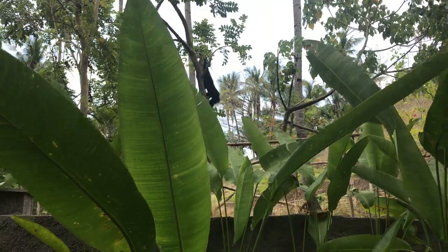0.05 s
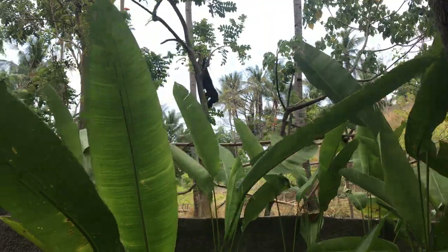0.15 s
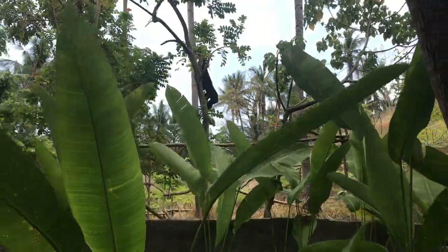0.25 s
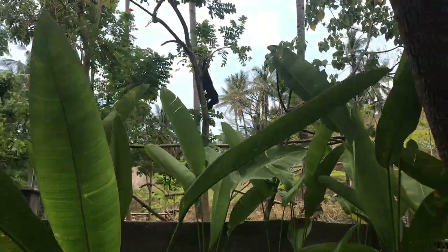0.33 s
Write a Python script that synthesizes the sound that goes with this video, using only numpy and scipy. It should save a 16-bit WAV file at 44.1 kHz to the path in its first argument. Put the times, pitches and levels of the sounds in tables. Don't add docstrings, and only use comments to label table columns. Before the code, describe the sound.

Loud gibbon calling in a leafy garden: a wavering sustained tone overlapped by a brief upward hoot, then a dozen quick downward whoops with dense short echo, faint air and soft wind bumps on a phone microphone.

```python
import sys
import numpy as np
from scipy import signal
from scipy.fft import rfft, irfft
from scipy.io import wavfile
from scipy.ndimage import uniform_filter1d

SR = 44100
rng = np.random.default_rng(int(sys.argv[2]) if len(sys.argv) > 2 else 0)


def store_wav(level_fs):
    pcm = np.round(np.clip(np.atleast_2d(level_fs), -1, 1) * 32767)
    wavfile.write(sys.argv[1], SR, pcm.T.astype(np.int16))


def makeup_ratio(level_db):
    decades = np.asarray(level_db, float) / 20
    return 10 ** decades


N = 132300

LEAD_S = 0.4
M = N + int(LEAD_S * SR)
T = np.arange(M) / SR - LEAD_S


def level(x, db):
    return x * makeup_ratio(db) / np.sqrt(np.mean(x ** 2))


def noise():
    return rng.standard_normal(M)


def band(x, low_hz, high_hz, order=2):
    return signal.sosfilt(signal.butter(order, [low_hz, high_hz], "band", fs=SR, output="sos"), x)


def lowpass(x, top_hz, order):
    return signal.sosfilt(signal.butter(order, top_hz, fs=SR, output="sos"), x)


def walk(rate_hz):
    size = int(SR / rate_hz)
    return level(uniform_filter1d(uniform_filter1d(noise(), size), size), 0)


def dip(f, centre_hz, width_hz, depth_db):
    return depth_db * np.exp(-((f - centre_hz) / width_hz) ** 2)


def voice(hz, gain, soft_db, breath_db):
    # frequency in Hz, level in dB.
    throat = np.array([(300, -11), (480, -6), (600, -1), (1100, -3), (1720, -1.5), (1950, -16),
                       (2550, -8.5), (4600, -19)])
    # low edge in Hz, high edge in Hz, level in dB.
    airy_bands = [(2700, 2760, 4), (6000, 7800, -3.5), (9000, 15000, -11.5)]
    tilt_db_per_octave = -14
    jitter, shimmer_db = 0.0022, 0.8

    hz = hz * (1 + jitter * walk(55))
    phase = 2 * np.pi * np.cumsum(hz) / SR
    breath = sum(level(band(noise(), low_hz, high_hz), db) for low_hz, high_hz, db in airy_bands)
    out = makeup_ratio(breath_db) * (1 + np.cos(phase)) * breath
    for k in range(1, 31):
        f = k * hz
        db = np.interp(np.log(f), np.log(throat[:, 0]), throat[:, 1])
        db = db + soft_db * np.log2(k)
        db = db + tilt_db_per_octave * np.log2(np.maximum(f / throat[-1, 0], 1))
        db = db + dip(f, 3450, 130, -18) + dip(f, 5350, 350, -6)
        out = out + np.sqrt(2) * makeup_ratio(db) * (f < 0.4 * SR) * np.sin(k * phase)
    return out * gain * makeup_ratio(shimmer_db * walk(31.2))


def sung(line, soft_db, opens_db=0):
    s, hz, db = np.array(line).T

    def smooth(values):
        return uniform_filter1d(np.interp(T, s, values), size=500)

    edge = np.clip(np.minimum(T - s[0], s[-1] - T) / 0.0048, 0, 1)
    pitch_hz = smooth(hz)
    soft_db = soft_db + opens_db * np.log2(pitch_hz / hz[0])
    return voice(pitch_hz, makeup_ratio(smooth(db)) * edge, soft_db, breath_db=-56)


def held_note():
    # time in seconds, pitch in Hz, level in dB.
    held_line = [
        (-.4, 859, -33.5),
        (.2, 858.2, -21.5),
        (.27, 848.5, -24),
        (.42, 868.1, -24),
        (.58, 852, -21.5),
        (.62, 861, -25),
        (.68, 853.7, -20.5),
        (.71, 827, -26),
        (.74, 823, -30),
    ]
    return sung(held_line, soft_db=0)


def garden(x):
    a = np.arange(2 * SR) / SR

    def fade(t60_s):
        return np.exp(-np.log(1000) * a / t60_s)

    def unit(v):
        return v / np.sqrt(np.sum(v ** 2))

    near_noise, far_noise = rng.standard_normal((2, len(a)))
    low = lowpass(near_noise, 2500, 1)
    near = low * fade(0.3) + (near_noise - low) * fade(0.56)
    near = unit(near * np.clip((a - 0.0055) / 0.0069, 0, 1))
    far = unit(far_noise * fade(2.76) * np.clip(a / 0.027, 0, 1))
    far = lowpass(far, 6000, 1)
    echo = signal.fftconvolve(x, makeup_ratio(-2.5) * near + makeup_ratio(-16) * far)[:M]

    facing, turned = lowpass(x, 1800, 2), lowpass(x, 1000, 2)
    direct = facing + np.interp(T, (1.1, 1.9), (0, 1)) * (turned - facing)
    round_head = x - direct
    return makeup_ratio(2.5) * direct + makeup_ratio(-16) * round_head + echo


def open_air():
    # frequency in Hz, noise density in dB per Hz.
    air_colour = np.array([(20, -24), (60, 0), (130, 0), (250, -7), (500, -20), (1500, -24), (5000, -26),
                           (16000, -31)])
    f = np.maximum(np.arange(M // 2 + 1) * SR / M, 1)
    colour = makeup_ratio(np.interp(np.log(f), np.log(air_colour[:, 0]), air_colour[:, 1]))
    return level(irfft(rfft(noise()) * colour, M), -62) * makeup_ratio(walk(1.7))


def distant_drone():
    centre_hz, width_hz = 320, 60
    hum = level(band(noise(), centre_hz - width_hz / 2, centre_hz + width_hz / 2), -57)
    return hum * makeup_ratio(-9 * np.clip(T / 0.95, 0, 1) + 0.69 * walk(1.3))


def rising_hoot():
    # time in seconds, pitch in Hz, level in dB.
    hoot_line = [
        (.12, 560, -66),
        (.15, 630, -37),
        (.19, 688, -28.5),
        (.29, 725, -32),
        (.385, 815, -25.5),
        (.48, 975, -24),
        (.52, 1078, -20),
        (.54, 1342, -24),
        (.552, 1580, -26),
    ]
    return sung(hoot_line, soft_db=-25.5, opens_db=14)


def whoops():
    # start in seconds, length in seconds, level in dB, top pitch in Hz, end pitch in Hz.
    whoop_rows = [(0.747, 0.053, -19, 844.5, 700.4), (0.847, 0.059, -16.5, 810.2, 598.8),
                  (0.991, 0.061, -15, 787, 572.3), (1.133, 0.071, -15.5, 776, 529),
                  (1.298, 0.082, -15.5, 786, 531), (1.468, 0.083, -16, 777, 521),
                  (1.633, 0.09, -16, 778, 494.3), (1.814, 0.083, -15.5, 792, 497.6),
                  (1.997, .102, -16, 777.4, 503), (2.197, 0.093, -15.5, 772.7, 501),
                  (2.396, 0.085, -15, 787.7, 496.7), (2.602, 0.089, -14, 789.5, 496)]
    lead_in_s, attack_s, release_s = 0.008, 0.01, 0.0073
    scoop, scoop_s = 0.07, 0.0074
    hold_share, bend, ease = 0.3, 1.3, 0.4
    peak_share, swell_db, fade_db = 0.62, 3, 5
    trail_s, trail_hz, trail_db = 0.04, 320, -13
    full_slide_hz = 650

    hz, gain, slide = np.full(M, 800.0), np.zeros(M), np.zeros(M)
    for start, length, db, top_hz, end_hz in whoop_rows:
        a = T - start
        since = np.maximum(a, 0)
        part = a / length
        after = np.clip((a - length) / trail_s, 0, 1)

        u = np.clip((part - hold_share) / (1 - hold_share), 0, 1) ** bend
        u = u + ease * u * (1 - u)
        f = top_hz * (1 - scoop * np.exp(-since / scoop_s))
        f = f - (top_hz - end_hz) * u - (end_hz - trail_hz) * np.sqrt(after)

        g = 1 - np.exp(-since / attack_s)
        g = g * makeup_ratio(db - swell_db * np.clip(1 - part / peak_share, 0, 1))
        g = g * makeup_ratio(-fade_db * np.clip((part - peak_share) / (1 - peak_share), 0, 1))
        g = g * makeup_ratio(trail_db * np.clip((a - length) / release_s + 1, 0, 1)) * (1 - after)
        g = g * ((a < length) | (end_hz < full_slide_hz))

        begun = a >= -lead_in_s
        hz = np.where(begun, f, hz)
        gain = np.where(begun, g, gain)
        slide = np.where(begun, u, slide)
    soft_db = -8.5 * slide - (T - 1)
    return voice(uniform_filter1d(hz, size=200), uniform_filter1d(gain, size=250), soft_db, breath_db=-30)


def wind_bumps():
    # centre in seconds, level in dB, length in seconds.
    bump_rows = [
        (.8, -61, .02),
        (.92, -54, .025),
        (1.46, -52, .04),
        (1.6, -47, .022),
        (2.1, -57, .05),
        (2.35, -55, .025),
    ]
    gusts = sum(makeup_ratio(db) * np.exp(-((T - s) / length) ** 2) for s, db, length in bump_rows)
    return gusts * level(band(noise(), 33, 129, order=1), 0)


def scene():
    apes = held_note() + rising_hoot() + whoops()
    heard = garden(apes) + open_air() + distant_drone() + wind_bumps()
    return heard[None, M - N:]


def top_cut(x):
    return signal.sosfilt(signal.butter(12, 16100, fs=SR, output="sos"), x)


def record(dry):
    starts_s = 0.0845
    mix = dry * (np.arange(N) >= starts_s * SR)
    return top_cut(mix)


dry = scene()
out = record(dry)
store_wav(out)
```